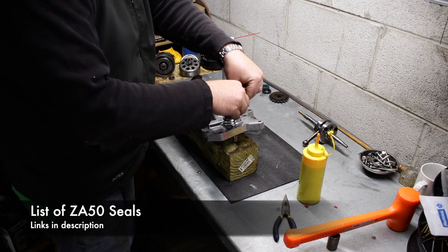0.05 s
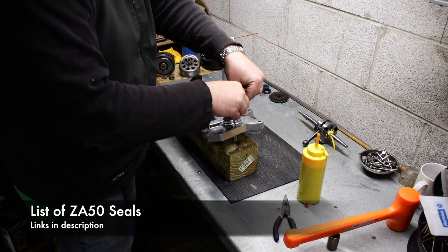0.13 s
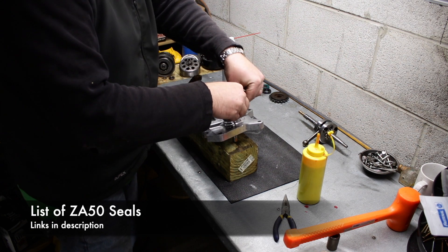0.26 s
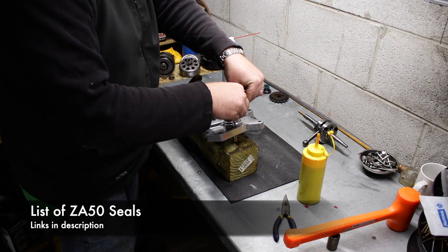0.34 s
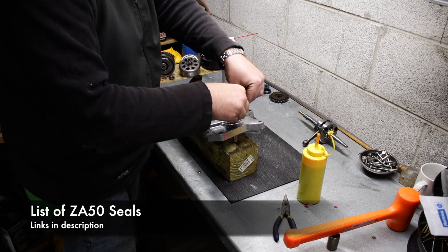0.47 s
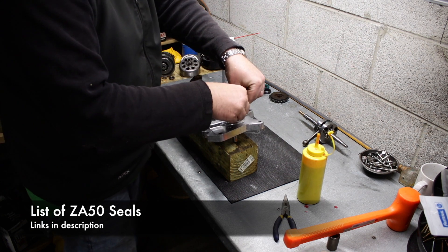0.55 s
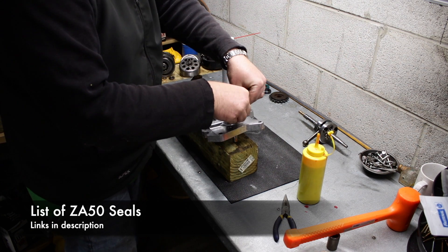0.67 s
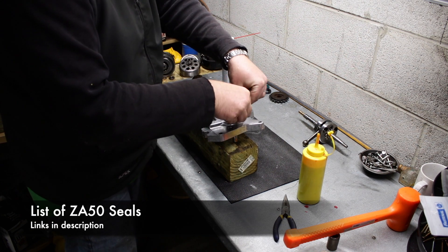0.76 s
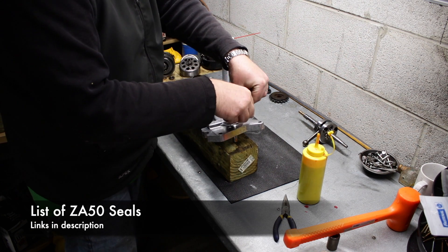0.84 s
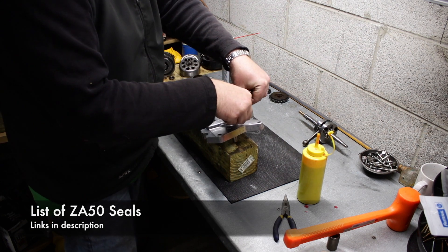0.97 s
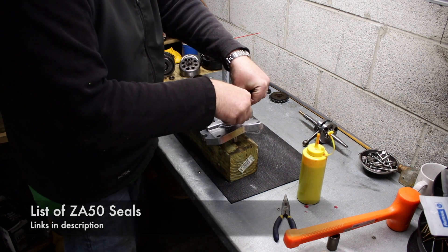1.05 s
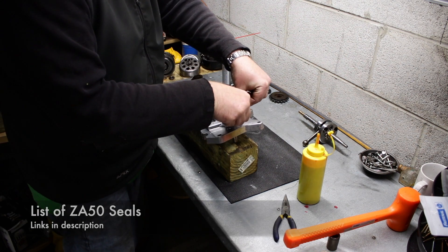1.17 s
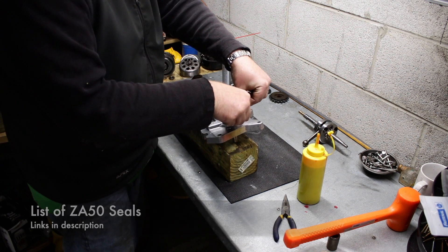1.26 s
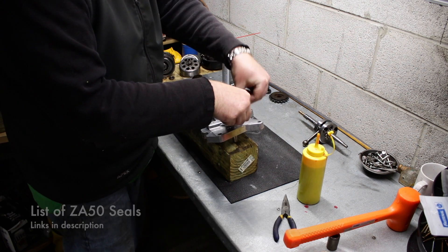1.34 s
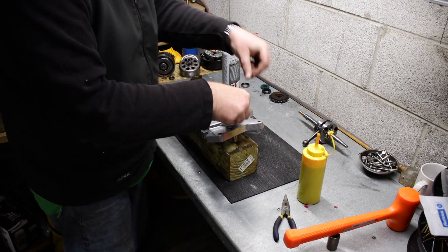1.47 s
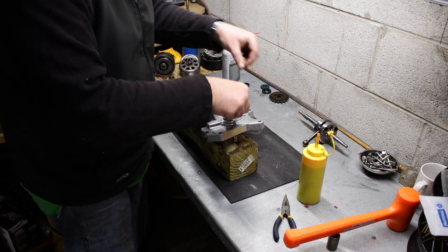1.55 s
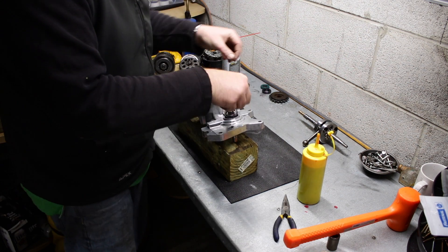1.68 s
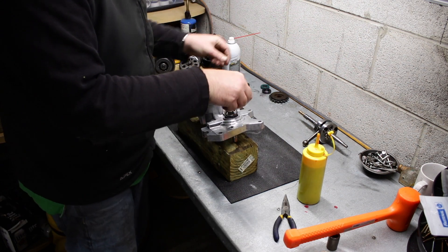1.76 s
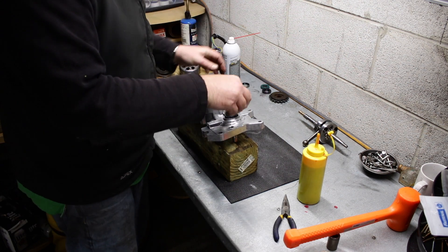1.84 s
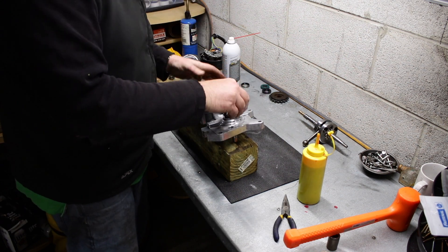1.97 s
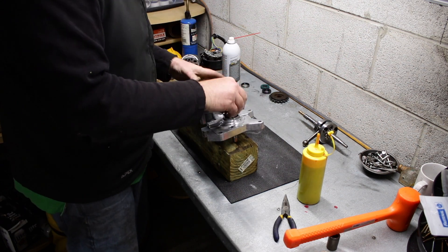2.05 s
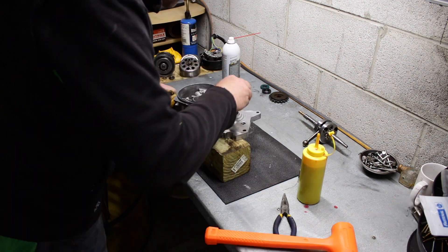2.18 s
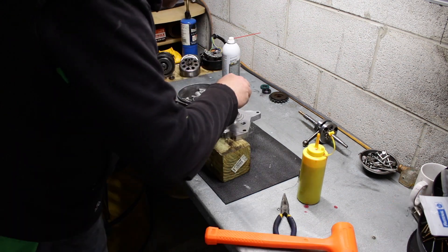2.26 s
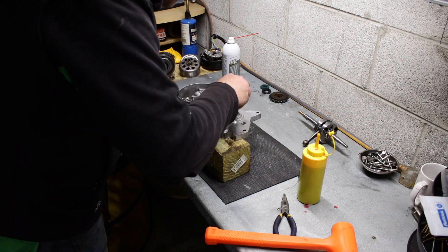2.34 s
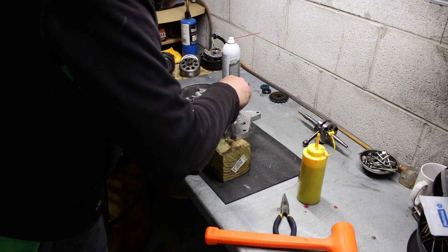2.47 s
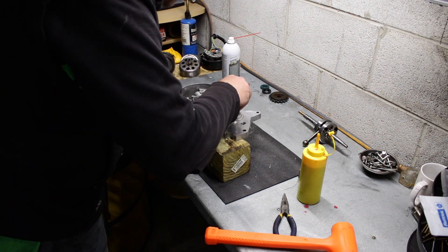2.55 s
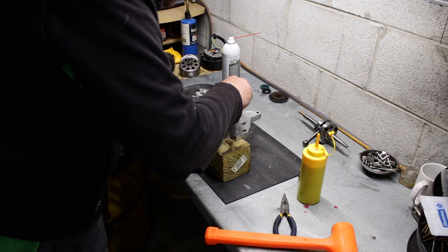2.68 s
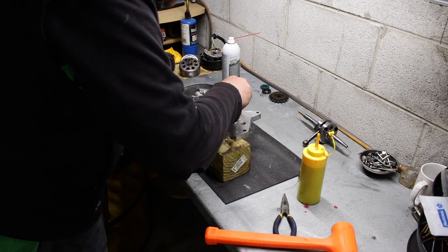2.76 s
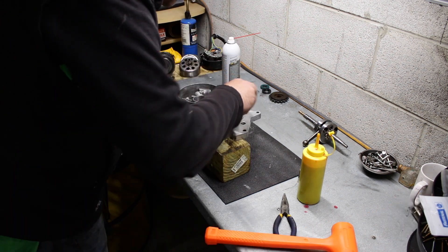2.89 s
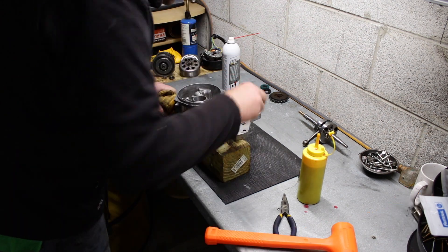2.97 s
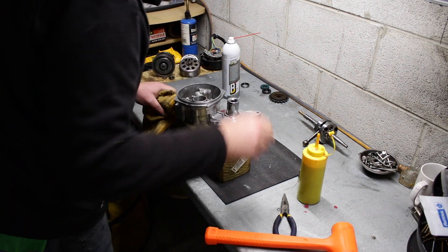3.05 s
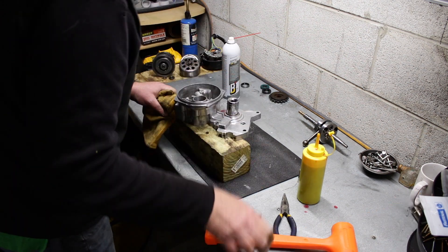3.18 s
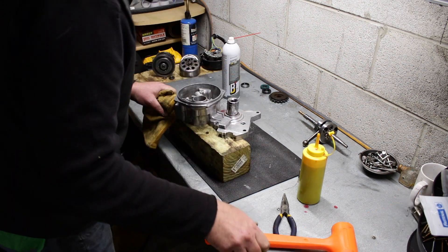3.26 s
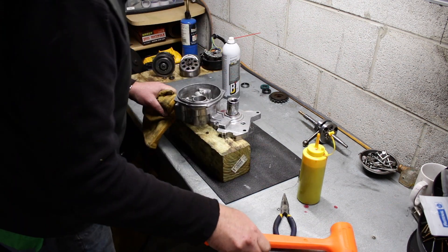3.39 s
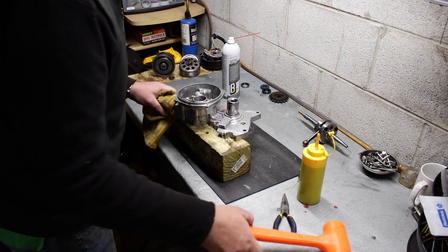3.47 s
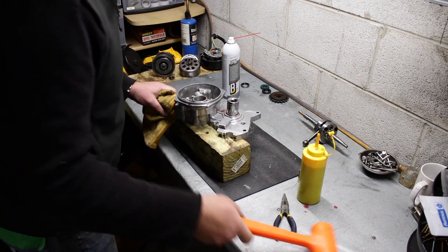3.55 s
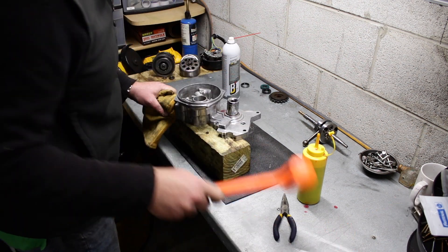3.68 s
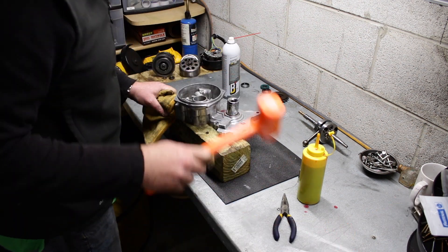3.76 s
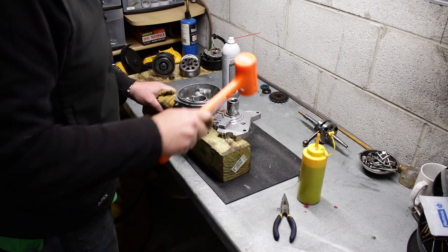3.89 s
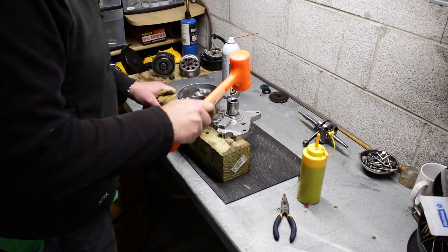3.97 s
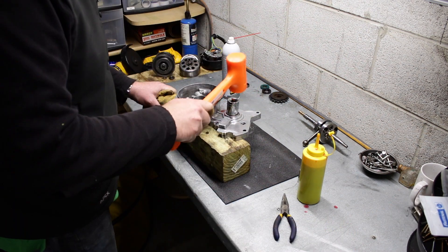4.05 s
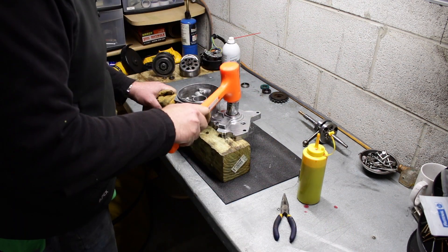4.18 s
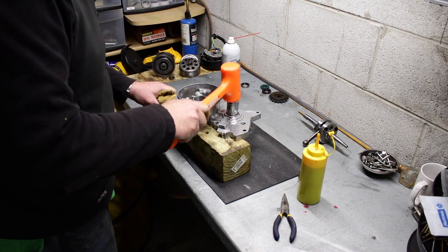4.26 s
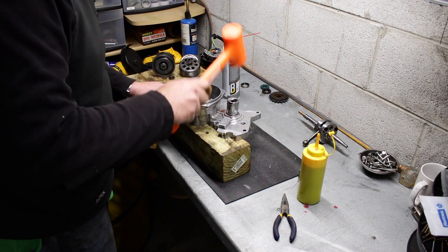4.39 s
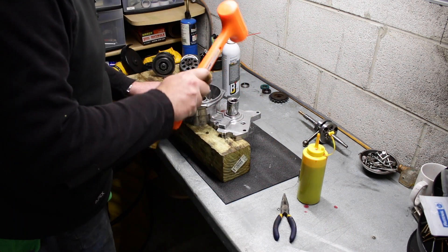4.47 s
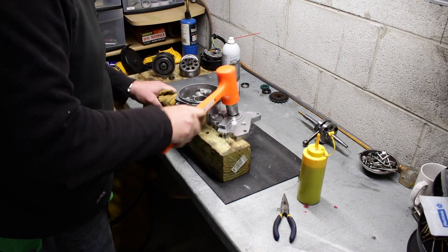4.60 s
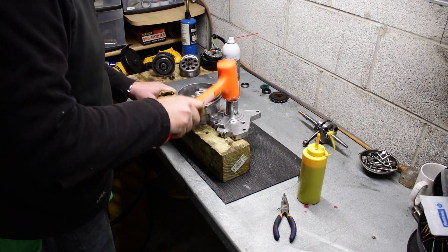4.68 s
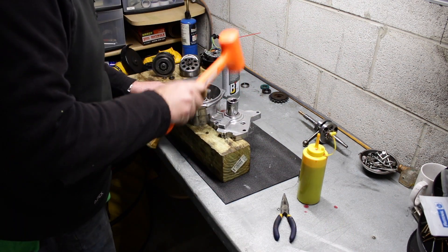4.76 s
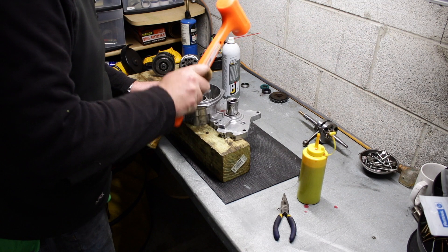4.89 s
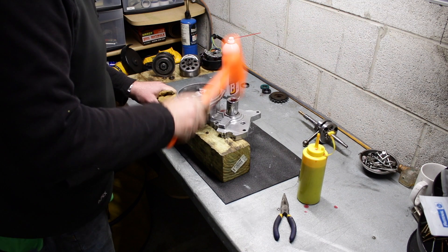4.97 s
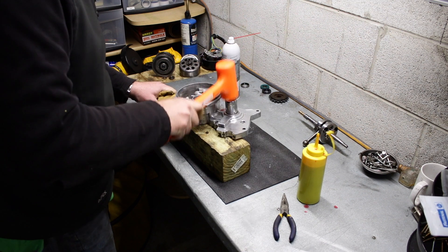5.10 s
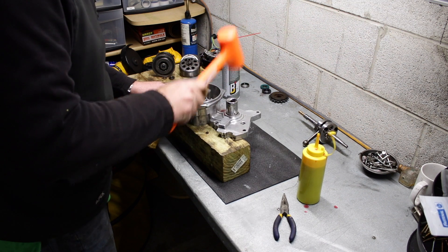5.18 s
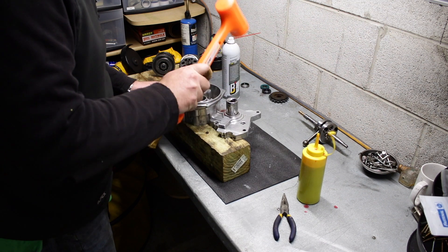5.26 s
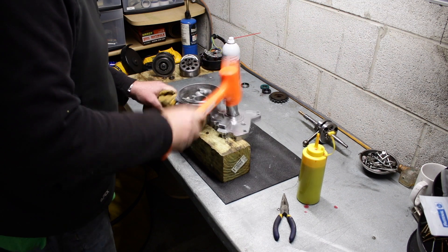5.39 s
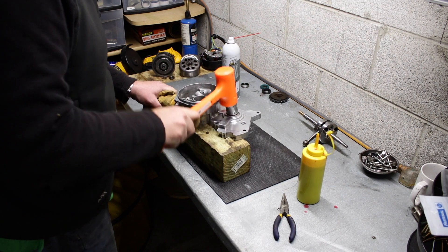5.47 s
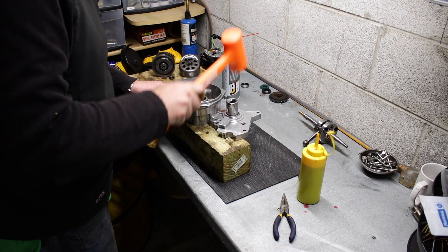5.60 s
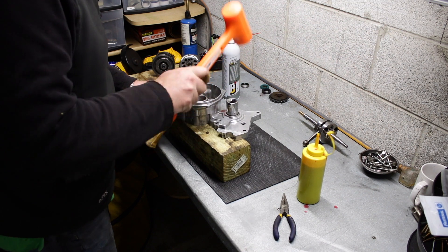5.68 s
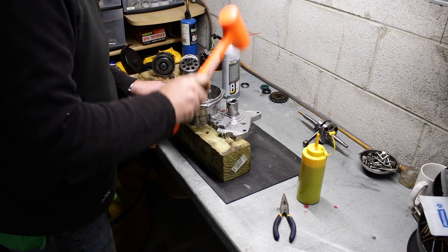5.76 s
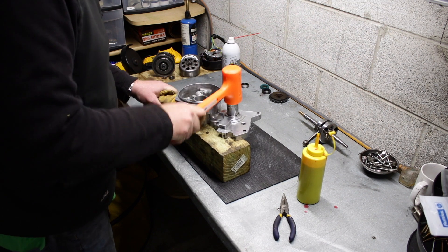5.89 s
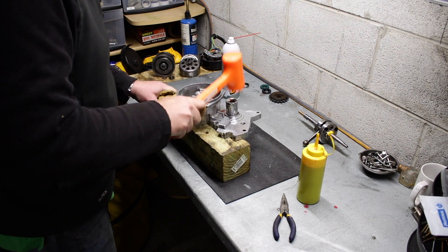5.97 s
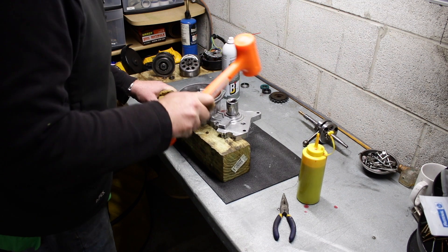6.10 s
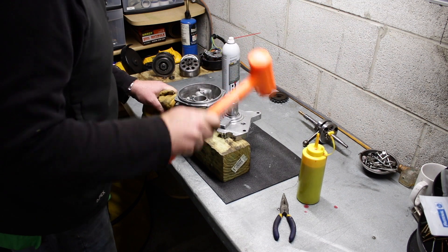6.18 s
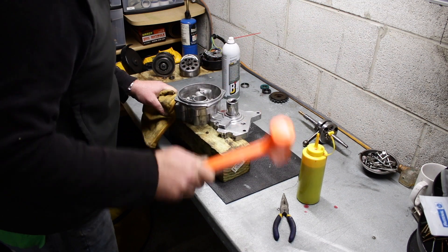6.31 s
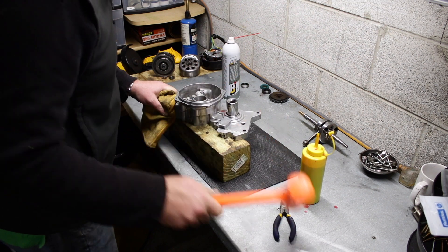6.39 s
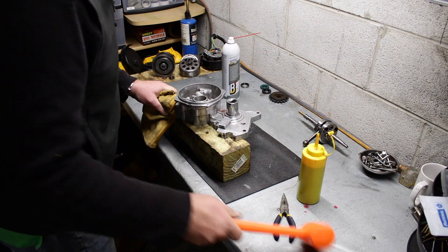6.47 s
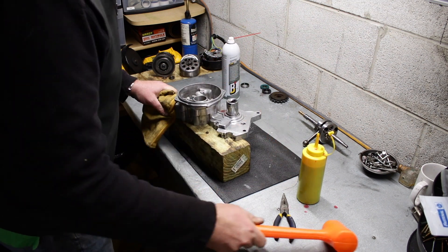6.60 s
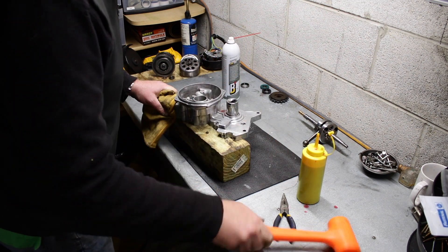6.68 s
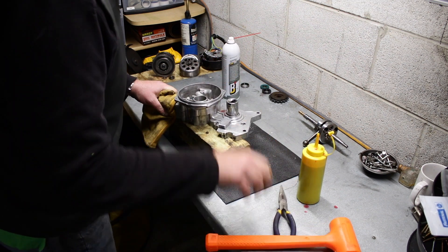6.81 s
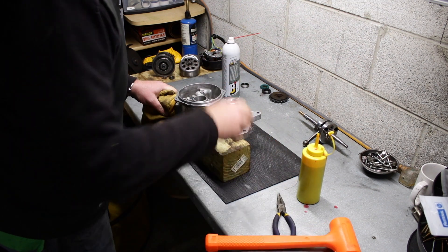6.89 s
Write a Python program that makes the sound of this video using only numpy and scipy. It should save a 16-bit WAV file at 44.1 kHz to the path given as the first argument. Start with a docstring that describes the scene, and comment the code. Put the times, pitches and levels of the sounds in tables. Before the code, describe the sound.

A mallet strikes a metal socket five times with ringing metallic knocks, then clatters onto a workbench in a garage.

```python
"""Two motors hum in a block-walled garage, a can clinks, and the hum drops out. Close to the microphone
a socket ticks onto an engine case. A shot-filled mallet slides off the steel bench, pellets swishing,
drives the socket down in five blows that ring shaft and case, then drops and bounces on the bench.
The mono recorder clips each blow and ducks, then swells into the echo of the room."""
import sys
import numpy as np
from scipy import signal
from scipy.fft import rfft, irfft
from scipy.io import wavfile
from scipy.ndimage import uniform_filter1d

SR = 44100
rng = np.random.default_rng(int(sys.argv[2]) if len(sys.argv) > 2 else 0)


def output_pcm(signal):
    """Save a mono or channel-first signal as 16-bit PCM at the path in sys.argv[1].

    Samples are clipped to [-1, 1] before scaling.
    """
    pcm = np.clip(np.atleast_2d(signal).T, -1, 1) * 32767
    wavfile.write(sys.argv[1], SR, np.round(pcm).astype(np.int16))


N = 306054


def gain_of(db):
    """dB to gain."""
    return 10 ** (np.asarray(db) / 20)


def unit_rms(x):
    """Scales to rms 1."""
    return x / np.sqrt(np.mean(x ** 2) + 1e-20)


def read(points, hz):
    """Reads a curve on a log-frequency axis."""
    f, value = np.transpose(points)
    return np.interp(np.log(hz + 1), np.log(f + 1), value)


def add(mix, s, sound):
    """Mixes a sound in at time s."""
    part = mix[round(s * SR):][:len(sound)]
    part += sound[:len(part)]


def by_law(law, db):
    """Level of a layer that follows its hit; a law is (level/dB, dB gained per dB of the hit)."""
    return law[0] + law[1] * db


def coloured(x, spectrum):
    """Gives x a spectrum, at rms 1."""
    gains = gain_of(read(spectrum, np.fft.rfftfreq(len(x), 1 / SR)))
    return unit_rms(irfft(rfft(x) * gains, len(x)))


def burst(db, spectrum, rise, t60):
    """Contact noise that rises fast and dies away; times in seconds."""
    t = np.arange(8192) / SR
    shape = gain_of(db - 60 * t / t60) * (1 - np.exp(-t / rise))
    sound = coloured(rng.standard_normal(len(t)), spectrum) * shape
    return sound * np.linalg.norm(shape) / np.linalg.norm(sound)


def ring(db, hz, modes, rough=0.81, flutter_s=0.0083):
    """A struck body: its modes wake unevenly, and loose contact makes each flutter as it dies."""
    level_db, t60 = np.transpose(modes)[:, :, None]
    t = np.arange(0, 1.4 * t60.max() ** .5, 1 / SR)
    uneven, phase = rng.standard_normal((2, len(modes), 1))
    knots = rng.standard_normal((len(modes), 400, 2)) @ [1, 1j]
    flutter = np.array([np.interp(t / flutter_s, np.arange(400), k) for k in knots])
    turns = np.exp(1j * (2 * np.pi * np.outer(hz, t) + phase))
    waves = gain_of(db + level_db + 2 * uneven - 60 * t / t60) * turns
    return (waves * (1 + rough * flutter)).imag.sum(0) * (1 - np.exp(-t / 0.001))


def rustle(curve, spectrum, per_s, grain_db):
    """Many tiny uneven contacts under a level curve; returns start time and sound."""
    s, db = np.transpose(curve)
    t = np.arange(s[0], s[-1], 1 / SR)
    size = gain_of(grain_db * np.minimum(rng.exponential(1, len(t)), 4))
    touches = rng.random(len(t)) < per_s / SR
    grains = coloured(size * touches * rng.standard_normal(len(t)), spectrum)
    return s[0], grains * gain_of(np.interp(t, s, db)) * signal.windows.tukey(len(t), .15)


# contact spectra (f/Hz, level/dB)
METAL_CRACK = [(180, -48.5), (300, -21), (1250, -3.5), (2030, -5.5), (3350, -11.5), (4230, -6.5),
               (5340, -17.5), (6960, -8), (10700, -24.5), (16000, -31)]
SOFT_CRACK = [(120, -29), (200, -12.5), (456, -6.5), (883, -1.5), (7830, -18.5), (9060, -28),
              (10900, -12.5), (13600, -45), (16000, -105)]
THUD = [(35, -33), (60, -3), (160, 2), (606, -6), (952, -9), (2290, -19), (2490, -19), (4420, -26),
        (8000, -43), (10400, -63.5), (17600, -120)]
SHOT_LANDING = [(47, -36.5), (80, 4.5), (1270, -3), (3340, -13.5), (4300, -36.5), (4770, -5.5), (7890, -35),
                (11000, -28), (12000, -49), (15600, -69.5), (22000, -120)]
# ringing bodies: pitches (f/Hz), then their modes (level/dB, t60/s)
CASE_HZ = 1750, 3090, 3246, 5448, 5658, 5900, 6240, 6405, 6500, 7354
CASE = [(-23.5, 0.11), (-6, 0.046), (-5.5, 0.066), (-7, 0.12), (0, 0.04), (0, 0.048), (-2.5, 0.035),
        (-19, 0.079), (-19.5, 0.086), (-22, 0.062)]
SHAFT_HZ = 3930, 4060, 4200, 4745
SHAFT = [(-27, 0.06), (3.5, 0.025), (3, 0.034), (-1, 0.085)]
SOCKET_HZ = 5399, 8387, 10630, 10780
SOCKET = [(-20, 0.08), (-11, 0.045), (-5.5, 0.13), (2, 0.064)]
HANDLE_HZ = 900, 1130, 1290
HANDLE = [(5, 0.033), (0, 0.065), (-1, 0.043)]
BENCH_HZ = 129, 180, 285, 371, 440, 528, 931, 1130
BENCH = [(2.5, 0.14), (0, 0.12), (-11.5, 0.24), (-4, 0.13), (2, 0.044), (3, 0.03), (-24, .05),
         (-7.5, 0.0077)]
BOWL_HZ = 712, 1297
BOWL = [(-19.5, 2), (3.5, 0.34)]
# laws against force: hard contact grows faster than the push
METAL_LAW, SOFT_LAW, THUD_LAW = (9.2, 2.1), (2.5, 0.93), (-7.5, 0.93)
SHOT_LAW, SHOT_THUD_LAW, HANDLE_LAW = (2.1, 1.7), (-4, 2), (-17.5, .05)
CASE_LAW, SHAFT_LAW, BENCH_LAW, BOWL_LAW = (-8, 2.6), (5, 2.2), (-13.5, 0.77), (-20, 1.25)
# mallet on socket (t/s, force/dB, how squarely the case is rung/dB, socket rattle/dB)
BLOWS = [(4.274, -17.5, -8, -20), (4.658, 1, 3.5, -27), (5.062, 1, 8, -11.5), (5.464, 0.5, 4.5, -32.5),
         (5.904, 0, -1, -21)]


def mallet_blows():
    """Close up, the mallet cracks on the socket; the force runs through shaft and case into the bench."""
    out = np.zeros(N)
    for s, db, square_db, socket_db in BLOWS:
        add(out, s, burst(by_law(METAL_LAW, db), METAL_CRACK, 0.00041, 0.051))
        add(out, s, burst(by_law(SOFT_LAW, db), SOFT_CRACK, 0.00014, 0.055))
        add(out, s, burst(by_law(THUD_LAW, db), THUD, 0.00065, 0.13))
        # the loose shot lands late
        add(out, s + .022, burst(by_law(SHOT_LAW, db), SHOT_LANDING, 0.0048, 0.056))
        add(out, s + .015, burst(by_law(SHOT_THUD_LAW, db), THUD, 0.0042, 0.084))
        add(out, s, ring(by_law(HANDLE_LAW, db), HANDLE_HZ, HANDLE, rough=0.21))
        # a square blow rings the case more and the shaft less
        add(out, s, ring(by_law(CASE_LAW, db) + square_db, CASE_HZ, CASE, rough=0.73))
        add(out, s, ring(by_law(SHAFT_LAW, db) - .45 * square_db, SHAFT_HZ, SHAFT, rough=0.059))
        add(out, s, ring(socket_db, SOCKET_HZ, SOCKET))
        add(out, s, ring(by_law(BENCH_LAW, db), BENCH_HZ, BENCH, rough=0.62))
        add(out, s, ring(by_law(BOWL_LAW, db), BOWL_HZ, BOWL, rough=0.5, flutter_s=0.069))
    return out


# slap of the handle (f/Hz, level/dB)
SLAP = [(120, -47), (200, -72), (394, -9.5), (1120, -2.5), (1620, -3.5), (3250, -18.5), (3490, -23.5),
        (7830, -23), (16000, -44)]
# bounces (t/s, handle slap/dB, head weight/dB)
BOUNCES = [(6.564, -7, -10), (6.571, -17, -8), (6.615, -25, -26), (6.642, -39, -28), (6.779, 2.5, -16),
           (6.819, -14, -13.5), (6.864, -12, -19), (6.89, -32, -19.5), (6.934, 0, -15)]


def mallet_drop():
    """The soft head and the handle bounce on the sheet-steel bench top."""
    out = np.zeros(N)
    for s, slap_db, weight_db in BOUNCES:
        add(out, s, burst(slap_db, SLAP, 0.00031, 0.069))
        add(out, s, burst(weight_db - 3, THUD, 0.002, 0.17))
        add(out, s, ring(weight_db, BENCH_HZ, BENCH, rough=0.38))
        add(out, s, ring(slap_db - 4.5, HANDLE_HZ, HANDLE, rough=0.38))
    return out


# socket meeting case (f/Hz, level/dB)
TICK = [(120, -35), (200, -7), (806, 0.5), (1080, -15), (1560, 4.5), (2380, -1.5), (9930, -23),
        (10900, -0.5), (16000, -77)]
# ring of its seat: pitches (f/Hz), modes (level/dB, t60/s)
SEAT_HZ = 1620, 3047, 3305, 4000, 4474, 6514
SEAT = [(-2, 0.046), (-11, 0.14), (1.5, 0.082), (-4, 0.057), (-14, 0.062), (-10, 0.062)]
SEAT_THUD_LAW, SEAT_RING_LAW, SEAT_BENCH_LAW = (6, 1.33), (40.4, 2.86), (9, 1.705)
# placing the socket (t/s, tick/dB, socket ring/dB)
SEATINGS = [(2.468, -29.5, -44), (2.494, -37.5, -39), (2.509, -23, -25.5), (2.569, -34, -50),
            (2.641, -29.5, -35.5)]
# its chatter (t/s, level/dB)
CHATTER = [(4.766, -32.5), (4.799, -53), (4.833, -47.5), (5.669, -51.5), (5.969, -54), (5.993, -57)]


def loose_socket():
    """The socket ticks into its seat on the case, and chatters there after blows."""
    out = np.zeros(N)
    for s, db, socket_db in SEATINGS:
        add(out, s, burst(db, TICK, 0.00054, 0.056))
        add(out, s, burst(by_law(SEAT_THUD_LAW, db), THUD, 0.0056, 0.091))
        add(out, s, ring(socket_db, SOCKET_HZ, SOCKET))
        add(out, s, ring(by_law(SEAT_RING_LAW, db), SEAT_HZ, SEAT, rough=0.17))
        add(out, s, ring(by_law(SEAT_BENCH_LAW, db), BENCH_HZ[2:], BENCH[2:], rough=0.68))
    for s, db in CHATTER:
        add(out, s, ring(db, SOCKET_HZ, SOCKET))
    return out


# the can: pitches (f/Hz), modes (level/dB, t60/s)
CAN_HZ = 1001, 1217, 3031, 3230, 3900, 4010, 4355, 5146, 6062
CAN = [(-25, 0.068), (-22.5, 0.23), (-24, 0.069), (-11.5, 0.15), (-6, 0.045), (-7.5, 0.087), (-11, 0.099),
       (-15, 0.047), (-22, .04)]
# touches on it (t/s, crack/dB)
CLINKS = [(.148, -67), (1.422, -22)]


def can_clinks():
    """Small parts touch a can and set it ringing."""
    out = np.zeros(N)
    for s, db in CLINKS:
        add(out, s, burst(db, METAL_CRACK, 0.00029, 0.047) + burst(db - 20, THUD, 0.0024, 0.24))
        add(out, s, ring(db + 8.5, CAN_HZ, CAN, rough=0.74))
    return out


# a light tap (f/Hz, level/dB)
TAP = [(180, -55), (300, -11), (1170, -4), (2100, -5.5), (2410, -11.5), (5130, -26.5), (6570, -28),
       (8290, -25), (12000, -35), (15600, -66), (22000, -120)]
# touches on the bench (t/s, tick/dB, thud/dB)
TAPS = [(2.169, -53.5, -50), (2.714, -44, -49), (2.728, -40, -62), (2.744, -41.5, -62), (2.881, -46.5, -67),
        (3.343, -31, -40.5), (3.349, -30.5, -33.5), (3.382, -37.5, -39), (3.463, -45, -50),
        (3.538, -32, -42)]


def bench_taps():
    """Fingers and tools touch the bench."""
    out = np.zeros(N)
    for s, tick_db, thud_db in TAPS:
        add(out, s, burst(tick_db, TAP, 0.00094, 0.071) + burst(thud_db, THUD, 0.007, 0.21))
    return out


# pellet hiss (f/Hz, level/dB)
SHOT = [(880, -7.5), (1500, -7), (3240, 1.5), (4360, -6.5), (8190, 2), (9800, -9), (13000, -1.5),
        (16300, -13)]
# slides of the shot (middle t/s, level/dB, hold/s)
SWISHES = [(3.551, -53, 0.078), (3.616, -40, 0.033), (3.76, -55, 0.0044), (3.881, -50, .02),
           (3.913, -46, .016), (4.597, -35.5, .012), (5.003, -36.5, 0.015), (5.394, -40.5, 0.025),
           (5.843, -39.5, 0.024), (6.779, -38, 0.0096), (6.815, -52, 0.021), (6.866, -47, .012)]
# stray pellets (start t/s, end t/s, level/dB)
STRAYS = [(3.966, 4.11, -66), (6.118, 6.55, -64.5), (6.632, 6.77, -58)]


def steel_shot():
    """Shot slides inside the mallet head; stray pellets tick as the mallet moves."""
    out = np.zeros(N)
    for s, db, hold in SWISHES:
        start, end = s - hold / 2, s + hold / 2
        swell = [(start - .062, db - 28), (start - .012, db - 14), (start, db)]  # creep, then gather
        fade = [(end, db), (end + .018, db - 17.5), (end + .059, db - 28)]  # settle, then trickle
        add(out, *rustle(swell + fade, SHOT, per_s=25000, grain_db=1.5))
    for start, end, db in STRAYS:
        add(out, *rustle([(start, db), (end, db)], SHOT, per_s=1500, grain_db=4))
    return out


# mallet rubbing on steel (f/Hz, level/dB)
RUB = [(290, -45), (500, -7.5), (693, -16), (1070, -13), (1330, 2), (1600, -6), (2050, -2), (2500, -7),
       (2900, -9.5), (8270, -22), (9000, -23), (11700, -49), (19800, -120)]
# course of the drag (t/s, level/dB)
DRAG = [(3.44, -56), (3.456, -51), (3.466, -41), (3.524, -44.5), (3.54, -31.5), (3.554, -36), (3.604, -45),
        (3.614, -33), (3.65, -54), (3.71, -60)]


def mallet_drag():
    """The mallet scrapes as it slides off the bench."""
    out = np.zeros(N)
    add(out, *rustle(DRAG, RUB, per_s=8000, grain_db=1.8))
    return out


# motor partials: multiples of its pitch, then level/dB
ORDERS = 1, 2, 3, 7.943
ORDERS_DB = -48.5, -60.5, -65, -65.5
MOTOR_HZ, DRONE_HZ, HUM_END_S = 91.5, 73.4, 2.225
DRONE_DB, LOAD_DB, LOAD_S = -40, 32, .45  # full level, start below it, time constant


def motors(t):
    """Nearby, one motor hums and wavers while a second loads up to a low drone."""
    drone = gain_of(DRONE_DB - LOAD_DB * np.exp(-t / LOAD_S)) * np.sin(2 * np.pi * DRONE_HZ * t)
    hum = sum(gain_of(db) * np.sin(2 * np.pi * (k * MOTOR_HZ * t + rng.random()))
              for k, db in zip(ORDERS, ORDERS_DB))
    waver = 1 + 0.24 * unit_rms(uniform_filter1d(rng.standard_normal(N), SR // 8))
    return np.sqrt(2) * (drone + hum * waver)


# decay between the block walls (f/Hz, t60/s)
GARAGE = [(60, 0.8), (250, 1), (1000, 0.78), (2500, 0.55), (5000, 0.3), (12000, 0.3)]


def wall_reflections():
    """Sparse reflections of random sign whose bands die at their own speed."""
    taps, count = np.zeros(SR), (SR - 301) // 20
    signs = rng.choice([-1., 1.], count)
    taps[np.arange(300, SR - 20, 20) + rng.integers(0, 20, count)] = signs
    hz, t, bands = signal.stft(taps, SR, nperseg=256)
    decay = gain_of(-60 * t / read(GARAGE, hz)[:, None])
    echo = signal.istft(bands * decay, SR, nperseg=256)[1]
    return echo / np.linalg.norm(echo)


def garage_echo(x):
    """Moving body and arm change the paths to the microphone: the sound drifts between two echoes."""
    turn = 2 * np.pi * .6 * np.arange(N) / SR
    shares = np.sin(turn), np.cos(turn)
    return sum(signal.fftconvolve(x * share, wall_reflections())[:N] for share in shares)


# room tone while the hum sounds and after it stops (f/Hz, level/dB)
AIR_HUMMING = [(8.8, -48), (15, -9.5), (87, -1), (151, -16), (280, -22.5), (364, -24), (581, -27),
               (672, -32), (734, -25.5), (1140, -33.5), (1440, -35), (3360, -45), (14900, -50.5),
               (16300, -61)]
AIR_QUIET = [(8.8, -14.5), (15, -2.5), (38, 3.5), (65, -11.5), (92, -1.5), (139, -21), (364, -27.5),
             (473, -31), (517, -28.5), (825, -33.5), (1710, -37), (1980, -40), (8320, -46), (14900, -52.5),
             (16300, -40)]


def room_tone(running):
    """The air of the garage rumbles faintly and changes colour when the hum stops."""
    humming = gain_of(-44.5) * coloured(rng.standard_normal(N), AIR_HUMMING)
    quiet = gain_of(-43.5) * coloured(rng.standard_normal(N), AIR_QUIET)
    return running * humming + (1 - running) * quiet


def scene():
    """At the microphone: bench work up close, with echo, room tone and motors behind it."""
    work = mallet_blows() + mallet_drop() + loose_socket() + can_clinks()
    work += bench_taps() + steel_shot() + mallet_drag()
    work += garage_echo(gain_of(-18) * work)
    low_cut = signal.butter(3, 85, "high", fs=SR, output="sos")  # small bodies radiate no deep bass
    t = np.arange(N) / SR
    running = np.clip((HUM_END_S - t) / 0.0079, 0, 1)
    return (signal.sosfilt(low_cut, work) + room_tone(running) + running * motors(t))[None]


THRESHOLD_DB, ATTACK_S, RECOVERY_DB_PER_S = -12.5, 0.0019, 106.4
HISS_DB, BAND_EDGE_HZ = -65.5, 15900


def record(dry):
    """Gain control ducks fast and recovers steadily; what slips past clips; then hiss and band limit."""
    power_db = 10 * np.log10(signal.lfilter([.012], [1, -.988], dry[0] ** 2) + 1e-12)
    recovery_db = np.arange(N) * RECOVERY_DB_PER_S / SR
    held_db = np.maximum.accumulate(power_db + recovery_db) - recovery_db
    over_db = np.maximum(held_db - THRESHOLD_DB, 0)
    lag = np.exp(-1 / (ATTACK_S * SR))
    ducked = dry / gain_of(0.95 * signal.lfilter([1 - lag], [1, -lag], over_db))
    clipped = .6 * np.tanh(ducked / .6)
    hissing = clipped + gain_of(HISS_DB) * rng.standard_normal(N)
    low_pass = signal.firwin(511, BAND_EDGE_HZ, window=("kaiser", 9), fs=SR)
    return signal.oaconvolve(hissing, low_pass[None], "same")


dry = scene()
out = record(dry)
output_pcm(out)
```